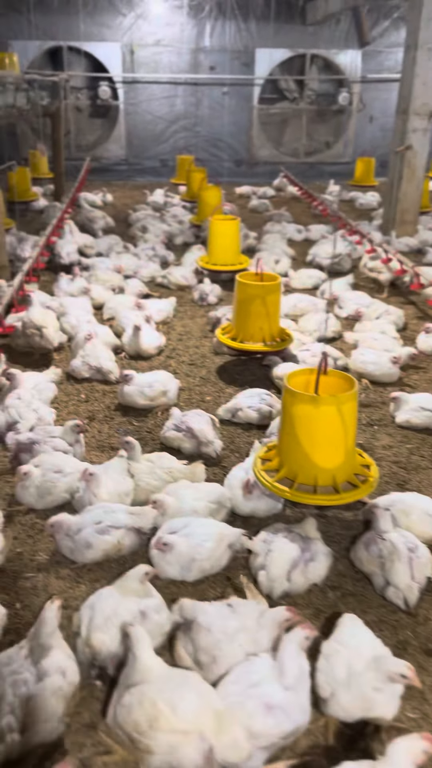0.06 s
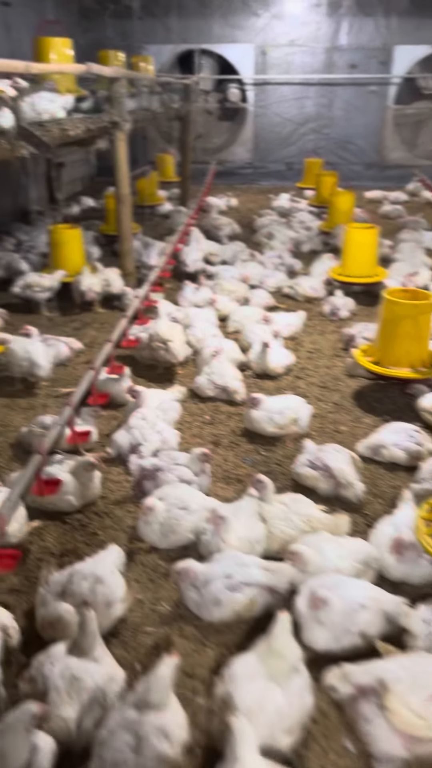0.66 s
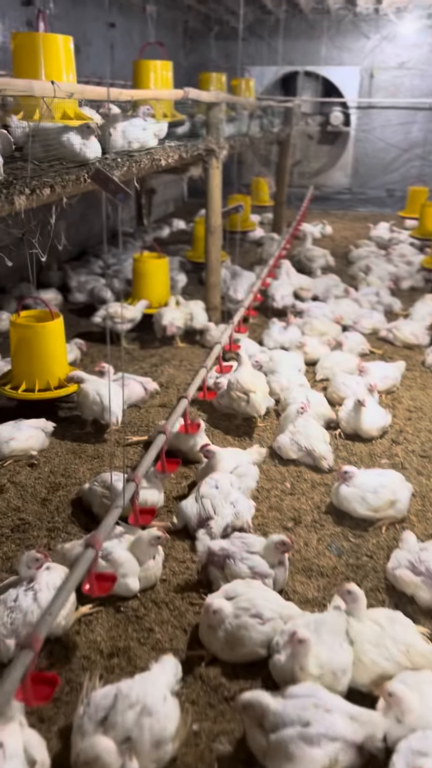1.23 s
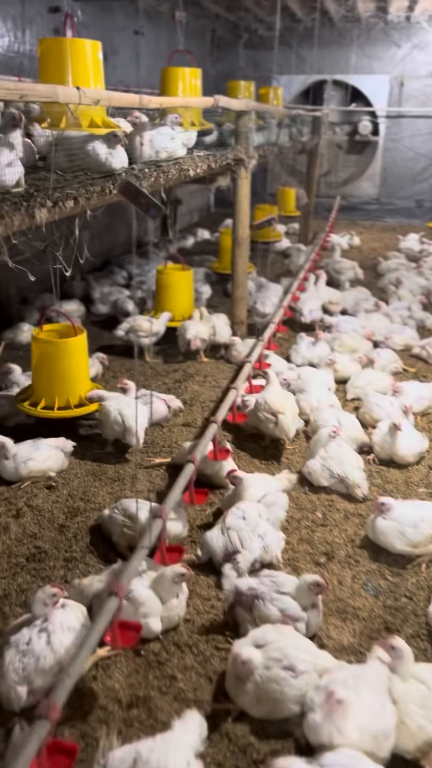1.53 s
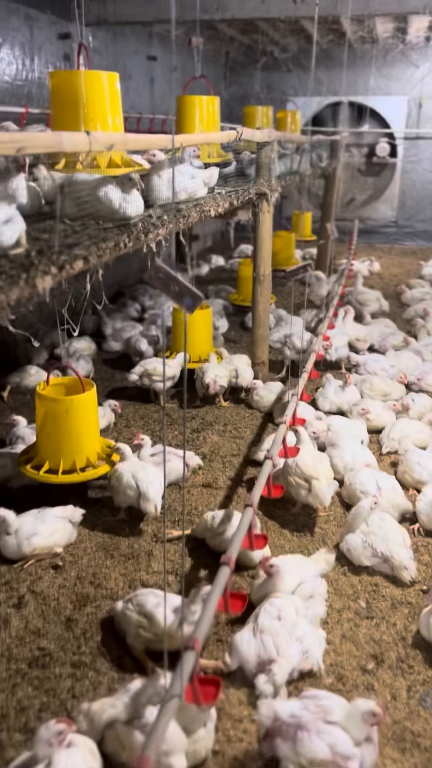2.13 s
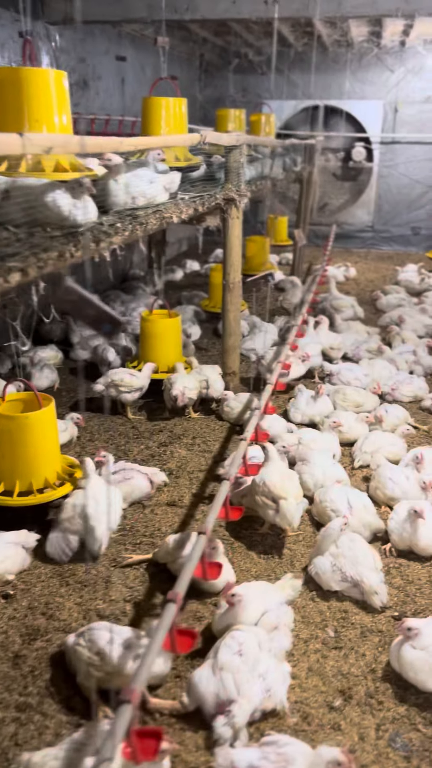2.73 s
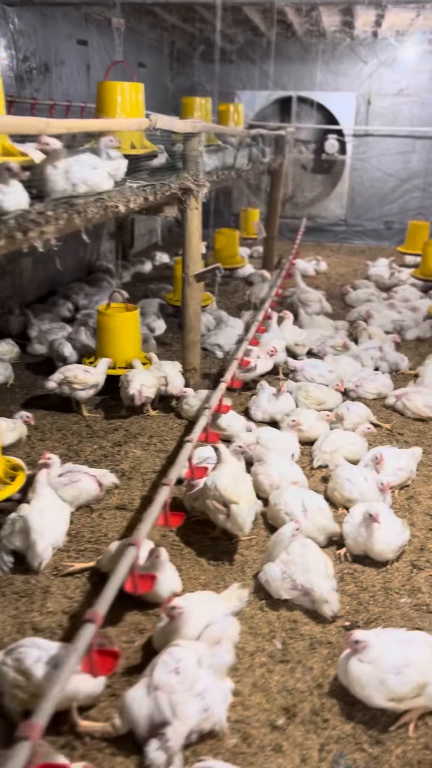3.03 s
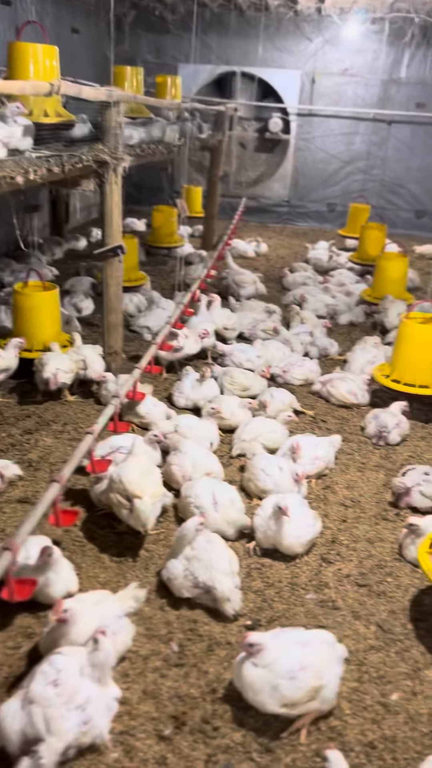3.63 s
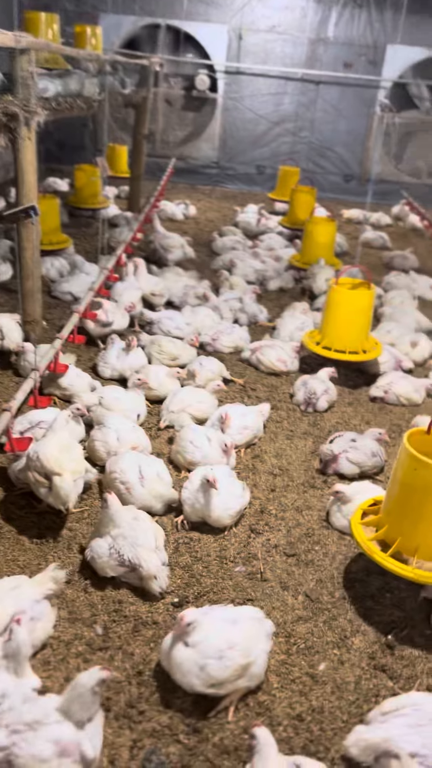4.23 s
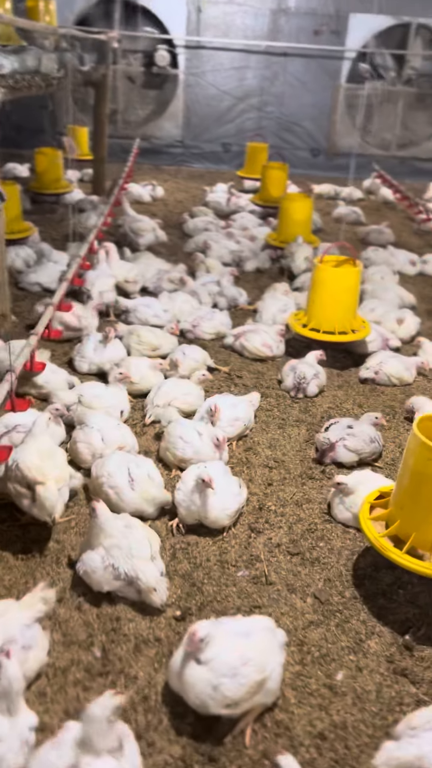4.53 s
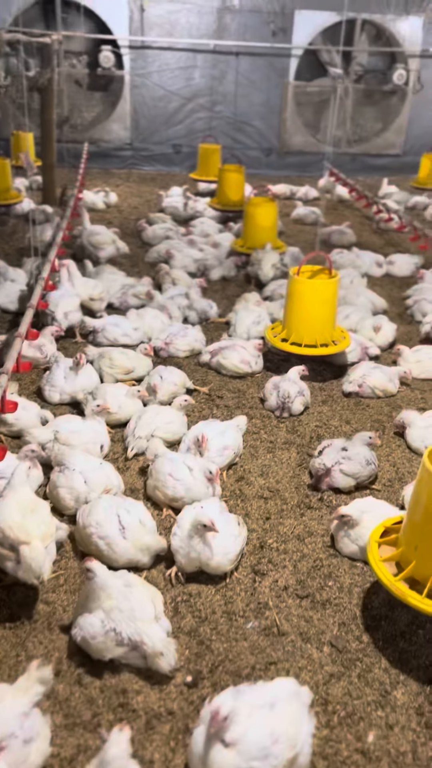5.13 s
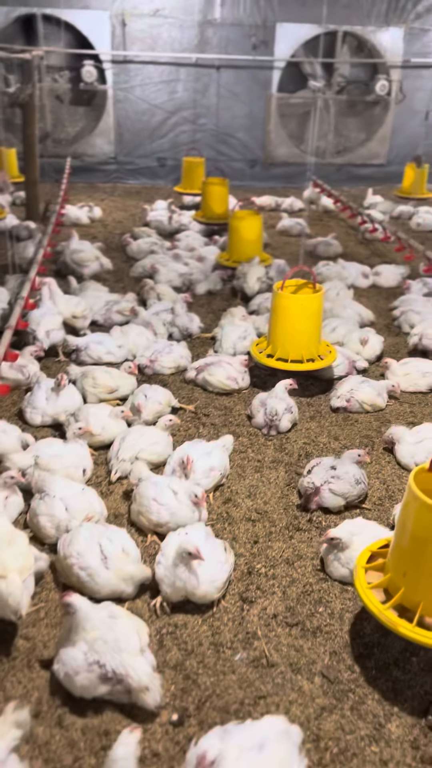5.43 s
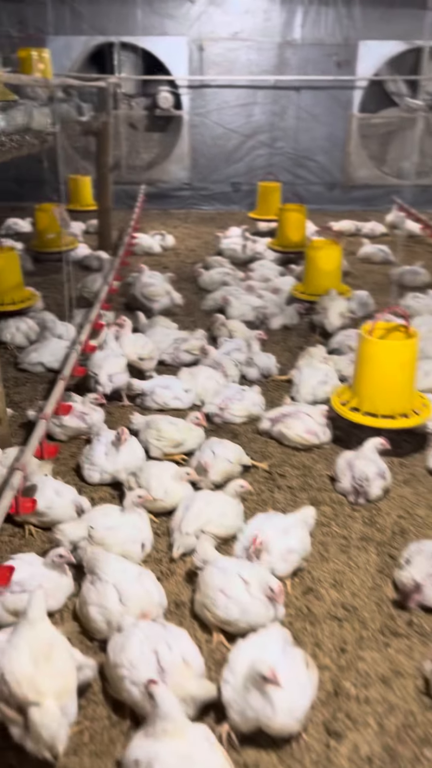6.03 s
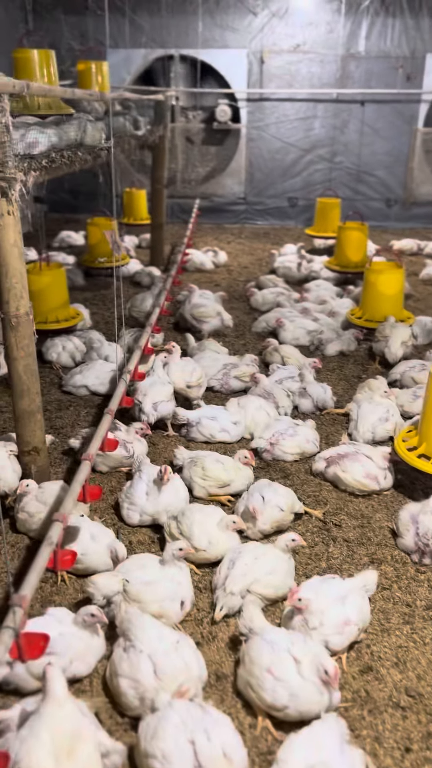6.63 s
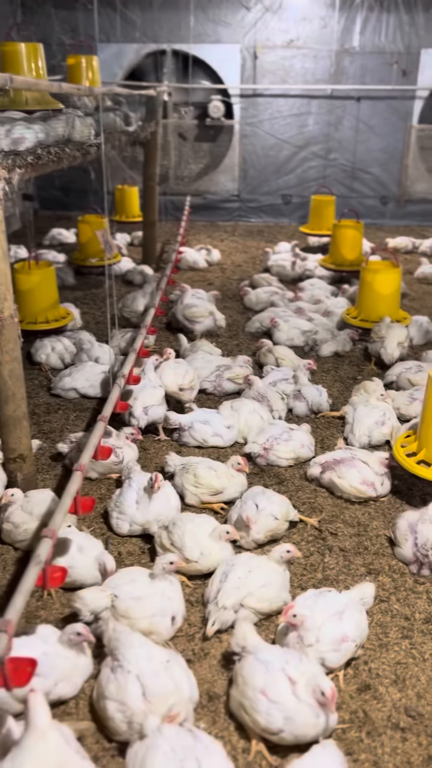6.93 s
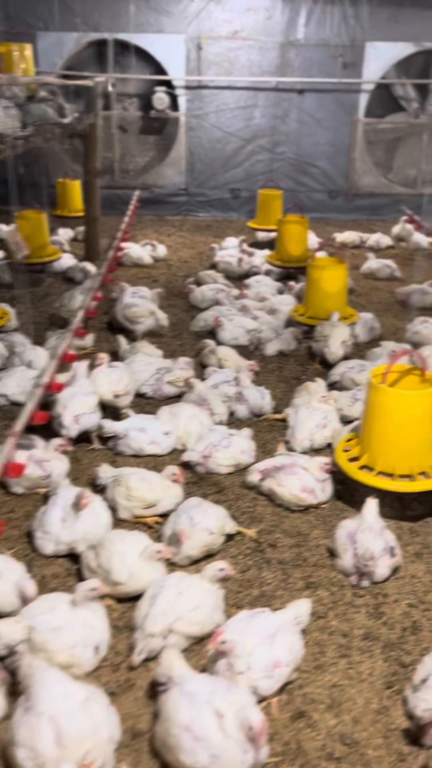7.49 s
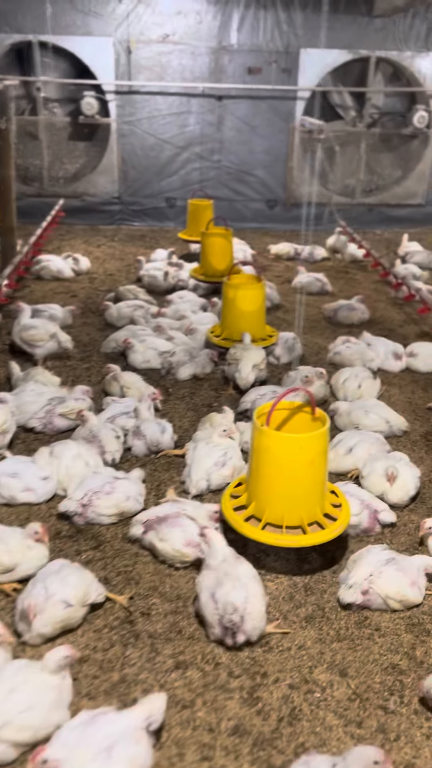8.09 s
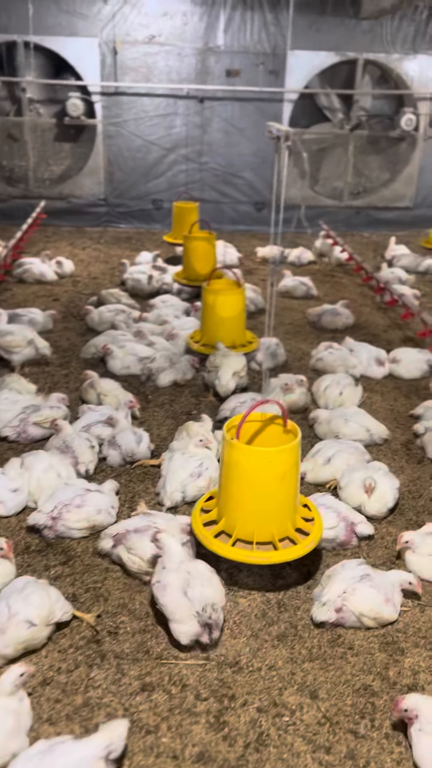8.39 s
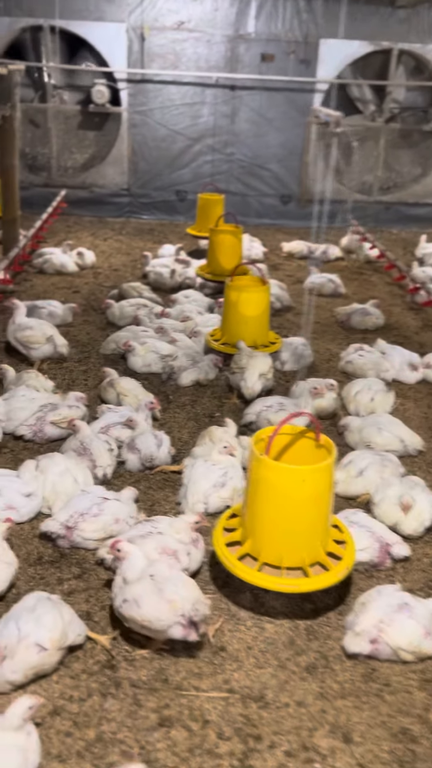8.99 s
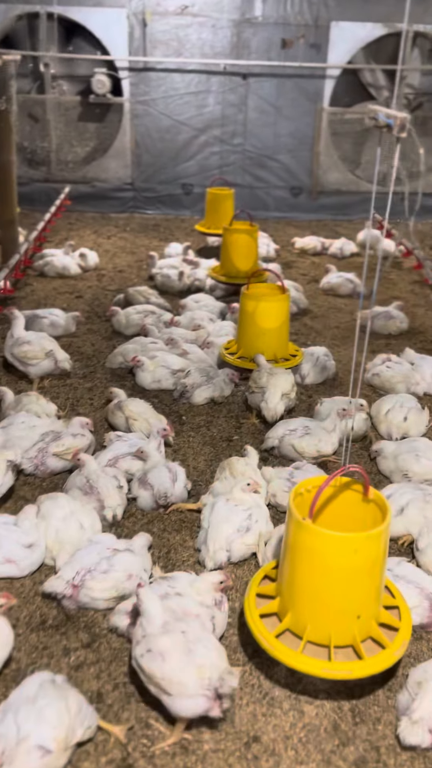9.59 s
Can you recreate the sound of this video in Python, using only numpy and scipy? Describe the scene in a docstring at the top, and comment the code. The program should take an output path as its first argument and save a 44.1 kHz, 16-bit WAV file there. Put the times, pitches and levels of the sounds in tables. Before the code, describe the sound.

A flock of young chickens chirps throughout over the constant drone and rush of exhaust fans in an enclosed shed. The closest birds begin with soft, falling peeps, then give a busy run of raspy chirps and clipped clucks before carrying on with scattered calls. Faint crunches come from the dry floor litter, and small pecking ticks appear later. The calls have a short echo, and the hum swells slightly towards the end.

```python
"""Young chickens peep and break into short clucks in a long poultry house; hundreds more chirp far off.
Each call is a gliding whistle from the bird's voice box, which flutters and rasps when it is hoarse.
Big exhaust fans in the end wall hum and push a rumble of air. Dry litter rustles and crunches
under feet and beaks, and the calls echo off the floor, feeders and walls."""
import sys
import numpy as np
from scipy import signal
from scipy.io import wavfile

SR = 44100
rng = np.random.default_rng(int(sys.argv[2]) if len(sys.argv) > 2 else 0)


def wav_out(sig):
    """Save sig, one row per channel (or a flat mono array), as 16-bit PCM at SR to the path in sys.argv[1]."""
    wavfile.write(sys.argv[1], SR, np.round(np.clip(np.atleast_2d(sig).T, -1, 1) * 32767).astype(np.int16))


N = 429975
TIME = np.arange(N) / SR
THROAT_HZ = (2130, 2850)  # the band where a bird's throat rings most

# Peeps that slide down (a positive pan is to the left): start_s, length_s, middle_hz, level_db, pan_db
FALLING_PEEPS = [(0.032, 0.043, 2500, -58, -5), (.127, 0.077, 2740, -49.5, 1), (.225, 0.055, 2650, -50, -2),
                 (0.481, 0.077, 2880, -48.5, 0), (.542, .02, 2740, -49, 0), (.645, 0.071, 2800, -49, -1),
                 (0.847, 0.041, 2280, -50, 0), (.94, 0.029, 2460, -47, 0), (1.02, 0.074, 2480, -53, 0),
                 (1.33, .06, 3500, -54, 0), (1.417, 0.02, 2850, -58, 0), (1.5, 0.05, 2350, -48, 2),
                 (2.115, .041, 3100, -49, -4), (2.161, 0.02, 2590, -39.5, -4), (2.232, 0.035, 2500, -54, 0),
                 (2.713, 0.056, 2340, -51, -2), (2.793, 0.034, 2590, -50, 2), (3.005, 0.018, 3900, -45, -2),
                 (3.1, 0.021, 1510, -36, 0), (3.198, 0.02, 1770, -38, -1), (3.603, 0.024, 3680, -41, 1),
                 (4.467, 0.065, 2720, -40, -1), (4.56, 0.038, 2440, -45.5, -2), (5.035, .05, 2400, -56, 4),
                 (5.155, 0.041, 3020, -43.5, -1), (5.503, 0.034, 3000, -43, -3),
                 (5.539, 0.04, 2850, -40.5, -3), (5.578, 0.031, 2620, -38, 0),
                 (5.792, .036, 2720, -43.5, -.5), (6.03, 0.041, 2280, -47.5, 5),
                 (6.075, 0.037, 1820, -40, 3), (6.256, 0.047, 1910, -44, 5), (6.382, .05, 2790, -51.5, 2),
                 (6.68, 0.065, 2400, -48, 0), (6.745, 0.017, 3340, -40, -1), (7.066, 0.032, 2230, -43, 5),
                 (7.313, 0.029, 2550, -38.5, 2), (7.514, .039, 2580, -47.5, 0),
                 (7.599, 0.041, 2860, -42, -2), (8.068, .029, 2340, -45, 5), (8.388, 0.032, 3180, -59, 0),
                 (8.596, 0.053, 3150, -56, 0), (8.647, 0.049, 2130, -45.5, 1), (8.721, .043, 2590, -49, 6),
                 (8.993, .035, 2850, -50, -2), (9.033, .033, 2320, -46, 10), (9.202, 0.036, 2520, -38, 4),
                 (9.259, 0.049, 2000, -48, 2), (9.335, 0.041, 2870, -44, 7),
                 (9.418, 0.025, 2270, -43.5, -1), (9.576, .016, 2200, -40, 0),
                 (9.592, 0.047, 3150, -43.5, -1), (9.617, .04, 2000, -47, 2), (9.65, .025, 2900, -47, 0)]
# Peeps that rise and then fall: start_s, length_s, top_hz, level_db, pan_db, hoarseness (0 is clear)
ARCHED_PEEPS = [(0.392, 0.027, 2330, -46, 9, 0.6), (1.197, 0.059, 2710, -47, -2, 0.66),
                (2.393, 0.083, 2650, -51, 3, 0.47), (3.017, 0.041, 2580, -41, -2, 1.05),
                (3.056, 0.071, 2600, -36.5, 0, 0.93), (3.161, 0.028, 3760, -38.5, -7, 0.37),
                (3.315, 0.04, 2770, -42, 2, .6), (3.378, .024, 2805, -40, 0, 0.64),
                (3.47, 0.098, 2580, -49, -1, .7), (3.558, 0.031, 2860, -37.5, 0, 0.37),
                (3.622, 0.019, 2920, -36, 0, 0.72), (3.653, 0.061, 2920, -45, -1, .9),
                (3.832, .039, 3070, -41, -2, 0.88), (4.024, 0.029, 2880, -41, 0, 0.63),
                (4.746, 0.097, 3246, -38, 0, 0.48), (5.192, 0.028, 2790, -40, 0, 0.3),
                (5.302, 0.056, 3330, -40, 0, 0.3), (6.275, 0.036, 2850, -44.5, 0, .5),
                (6.615, .0385, 2785, -39.5, 0, 0.74), (6.755, 0.034, 2860, -40, -2, 0.77),
                (6.942, 0.036, 2400, -48, 2, .6), (7.231, 0.091, 2680, -45, -1, .25),
                (7.912, 0.085, 2960, -46.5, 0, 0.38), (7.917, 0.036, 2030, -41, 5, 0.77),
                (8.325, .04, 2740, -45.5, 1, 0.2), (8.832, 0.14, 1840, -52, 3, 0),
                (9.069, 0.05, 2900, -44.5, 4, 1.07)]
def near_peeps():
    """Nearby birds peep in two shapes, a slide and an arch, stretched to each call's pitch and length."""
    slides = [(start, length, 1.28 * hz, hz, .85 * hz, db, pan_db, .52)  # all mildly hoarse
              for start, length, hz, db, pan_db in FALLING_PEEPS]
    arches = [(start, length, .82 * hz, hz, .76 * hz, db, pan_db, hoarse)
              for start, length, hz, db, pan_db, hoarse in ARCHED_PEEPS]
    return peeps(slides + arches, second_db=-28, third_db=-23)


def peeps(calls, second_db, third_db):
    """Each peep glides through three pitches; a hoarse one also flutters, rasps and buzzes."""
    out = np.zeros((2, N))
    rasp = .36 * noise_in(THROAT_HZ, (2, N))
    flutter = .05 * drift(55) + .018 * drift(450)
    shimmer_db = 4 * np.minimum(drift(80) + drift(400), 2)
    buzz, below, above = voice_buzz(buzz_hz=540, side_db=-5)
    # each bird calls from its own direction and reaches one ear first
    ear_lags = np.round(rng.uniform(-1, 1, len(calls)) * .00011 * SR).astype(int)
    for (start, length, first, middle, last, db, pan_db, hoarse), lag in zip(calls, ear_lags):
        at = span(start, start + length)
        progress = np.clip((TIME[at] - start) / length, 0, 1)
        glide = np.polyval(np.polyfit([0, .5, 1], [first, middle, last], 2), progress)
        pitch = glide * (1 + hoarse * flutter[at])
        phase = 2 * np.pi * np.cumsum(pitch) / SR
        side_tones = below[at] * np.sin(phase - buzz[at]) + above[at] * np.cos(phase + buzz[at])
        voice = whistle(pitch, second_db, third_db) + hoarse ** 2 * np.sqrt(2) * side_tones
        voice = rms_one(voice * from_db(hoarse * shimmer_db[at]))
        voice *= from_db(-3 * np.clip((pitch - 2850) / 400, 0, 1))  # weaker above the throat's band
        both_ears = [voice, np.roll(voice, lag)] + hoarse * rasp[:, at]
        swell = np.sqrt(2 * np.abs(np.sin(np.pi * progress ** 1.22)))
        out[:, at] += panned(both_ears * swell * from_db(db), pan_db)
    return out


def whistle(pitch, second_db, third_db):
    """The voice box makes a tone with weaker overtones at two and three times its pitch."""
    phase = 2 * np.pi * np.cumsum(pitch) / SR
    overtones = from_db(second_db) * np.sin(2 * phase) + from_db(third_db) * np.sin(3 * phase)
    return np.sqrt(2) * (np.sin(phase) + overtones)


def voice_buzz(buzz_hz, side_db):
    """A rough voice buzzes, adding a tone below and above the whistle: the buzz's phase, their gains."""
    phase = 2 * np.pi * np.cumsum(buzz_hz * np.exp(.2 * drift(15))) / SR
    below, above = (from_db(side_db + 5 * np.minimum(drift(45), 1.3)) for _ in range(2))
    return phase, below, above


# Clucks, each centred on its low note:
# time_s, half_length_s, pitch_hz, level_db, overtone_db, relative_hiss_db, beak_ring_hz
CLUCK_NOTES = [(1.548, 0.009, 1365, -41, -20, -76, 6000), (3.025, .004, 1760, -29, -26, -67, 6600),
               (3.047, .004, 1760, -31, -25, -72, 6600), (3.088, .0037, 1746, -27, -25, -69, 6500),
               (3.195, 0.0042, 1820, -21, -15, -62, 7300), (3.403, 0.0063, 1670, -29.5, -22, -55.5, 6100),
               (3.44, .0044, 1422, -34, -16, -66, 5750), (3.648, .005, 1560, -38, -8, -57, 5750),
               (3.715, 0.0068, 1344, -34.5, -19, -71, 6000), (3.851, .0065, 1705, -28.5, -17, -51, 7300),
               (4.056, 0.0065, 1590, -33.5, -20, -55.5, 5850), (4.746, .005, 1382, -31, -9, -58, 7050),
               (4.809, 0.0049, 1540, -33.5, -14, -74, 7600), (4.991, .008, 1364, -27, -34, -59, 7450),
               (5.345, 0.0077, 1995, -34, -18, -62, 6800), (5.494, 0.011, 1845, -35, -14, -69, 7000),
               (6.764, .005, 1520, -34, -8, -73, 6000), (7.142, 0.015, 1620, -30.5, -20, -55.5, 5800),
               (7.41, 0.0067, 1403, -31.5, -17, -56, 7500), (7.636, 0.0081, 1414, -35.5, -14, -63, 7600),
               (8.074, 0.017, 1015, -34.5, -12, -68, 7000), (8.329, 0.0084, 1560, -31, -24, -60, 7550)]
def clucks(lead_s, lead_db, leap, jitter, rasp):
    """A thin high note breaks down to a short, loud, rough one; the throat rasps and the beak hisses."""
    out = np.zeros((2, N))
    flutter, shake = drift(458), np.minimum(drift(500), 2)
    throat, hiss = noise_in(THROAT_HZ, (2, N)), noise_in((5950, 10800), (2, N))
    grit, crackle = rms_one(from_db(1.2 * shake)), from_db(3.5 * shake)
    for time_s, half_length, hz, db, overtone_db, hiss_db, beak_hz in CLUCK_NOTES:
        at = span(time_s - .06, time_s + .06)
        t = TIME[at] - time_s
        high = (1 - np.tanh((t + .65 * half_length + .004) / .0025)) / 2  # 1 before the break, then 0
        sag = np.exp(-rng.uniform(1, 5) * np.clip(t, -.008, .02))
        wobble = 1 + jitter * flutter[at] * (high + .61)
        pitch = hz * (1 + (leap - 1) * high) * sag * wobble
        low_note = np.exp(-(t / (.9 * half_length)) ** 2)
        lead_note = from_db(lead_db) * crackle[at] * np.exp(-((t + .2 * lead_s) / lead_s) ** 2)
        puff = np.exp(-((t + .002) / .018) ** 2)
        tone = whistle(pitch, overtone_db, third_db=-29.5) * (low_note + lead_note)
        voice = from_db(db) * (tone + rasp * puff * throat[:, at]) * grit[at]
        beak_ring = noise_in((beak_hz - 275, beak_hz + 275), (2, len(at)))
        breath = from_db(hiss_db + 7.5) * puff * (hiss[:, at] + beak_ring)
        out[:, at] += panned(voice + breath, pan_db=1.3)
    return out


def far_birds(count, pitch_hz, spread, length_s, fall, hoarse):
    """Birds all over the house call at random times, mostly falling in pitch, some hoarser than others."""
    when, long, size, bend, steep, loud, side, rough = rng.uniform(-1, 1, (count, 8)).T
    starts, lengths = (when + 1) / 2 * TIME[-1], length_s * 2 ** long
    middle_hz = pitch_hz * np.exp(spread * size)
    drop = fall * (1 + .73 * steep)
    first_hz, last_hz = middle_hz * (1 + drop * bend / 2 + drop), middle_hz * (1 - drop)
    calls = zip(starts, lengths, first_hz, middle_hz, last_hz, 5 * loud, 5 * side, hoarse * (1 + rough / 2))
    return rms_one(peeps(list(calls), second_db=-19, third_db=-41))


# The hum's three tones along the way through the house: time_s, first_db, second_db, third_db
HUM_LEVELS = [(0.0, -25, -36.5, -43.5), (0.43, -25.5, -46, -43.5), (2.15, -25.5, -28.5, -39.5),
              (7.3, -25, -27, -46.5), (7.85, -25, -35, -40), (8.6, -24.5, -27, -40.5),
              (9.38, -22.5, -33.5, -37), (9.75, -23.5, -29.5, -39)]
# How much the upper two tones waver: time_s, share_of_strength
HUM_WAVER = [(5.5, .08), (7.3, .15), (8, .3)]
def fan_hum(pitch_hz):
    """The fans hum on one low tone, with wavering overtones at two and three times its pitch."""
    phase = 2 * np.pi * pitch_hz * TIME
    waver, = in_time(HUM_WAVER)
    hum = 0
    for k, db, pan_db in zip((1, 2, 3), in_time(HUM_LEVELS), (.22, .85, .8)):
        swing = 1 + (k > 1) * waver * (drift(6.8) + 1j * drift(4.9))  # shakes strength and phase
        angle = k * phase + .34 * drift(5.4) + rng.uniform(0, 2 * np.pi)
        tone = np.sqrt(2) * np.imag(swing * np.exp(1j * angle))
        hum += panned(from_db(db + .29 * drift(1)) * tone, pan_db)
    return hum


# Thin tones of the fans: pitch_hz, level_db
WHINE_TONES = [(401, -53), (497, -54.5), (602, -52), (825, -49.5), (926, -52), (1028, -53.5)]
def fan_whine():
    """The fans also give off faint, nearly steady higher tones."""
    whine = sum(from_db(db + .56 * drift(1.8)) * np.sin(2 * np.pi * hz * TIME + drift(2.5))
                for hz, db in WHINE_TONES)
    return panned(np.sqrt(2) * whine, pan_db=2.5)


# How the air noise swells: time_s, relative_rumble_db, relative_rush_db
AIR_LEVELS = [(0.0, -33.5, -39), (4.61, -32, -36), (4.97, -34, -36.5), (5.4, -32, -35.5),
              (9.75, -34.5, -32.5)]
# Tone colour of the deep rumble: frequency_hz, relative_db
RUMBLE_COLOUR = [(16, -24), (30, -24), (42, -6.5), (62, 1.5), (85, -6), (105, -7.5), (140, -9), (220, -18)]
# Tone colour of the brighter rush: frequency_hz, relative_db
RUSH_COLOUR = [(90, 1), (135, 8), (220, 6), (330, -2), (620, -2.5), (1000, -5.5), (1450, -12), (2000, -25),
               (3000, -28), (4500, -31.5), (8000, -53)]
def fan_air():
    """Air pushed by the fans rumbles and rushes."""
    rumble_db, rush_db = in_time(AIR_LEVELS)
    deep = banded_noise(RUMBLE_COLOUR, flicker_db=1).mean(axis=0)  # long waves reach both ears alike
    rumble = from_db(rumble_db + 3.5) * rms_one(deep)
    air = banded_noise(RUSH_COLOUR, flicker_db=1.5)
    low = signal.sosfilt(signal.butter(1, 620, fs=SR, output="sos"), air)
    swell_db = rush_db - rush_db.mean()
    rush = from_db(swell_db) * low + from_db(.53 * swell_db) * (air - low)  # the treble swells less
    return rumble + from_db(rush_db.mean() + 5) * rush


# Loudness of the constant rustle: time_s, relative_db
RUSTLE_LEVELS = [(0.0, -54), (0.32, -55.5), (1.17, -55.5), (1.41, -58), (4.07, -53.5), (5.76, -54),
                 (6.3, -55.5), (6.81, -54.5), (7.39, -51.5), (8.77, -57), (9.75, -54)]
# Tone colour of the dry husks: frequency_hz, relative_db
RUSTLE_COLOUR = [(2500, -10), (5100, -8), (5900, -2), (8000, -2), (11000, -1.5), (12500, -12.5),
                 (16000, -1.5)]
# Crunches in the litter: start_s, relative_db
LITTER_CRUNCHES = [(1.115, -49), (1.24, -48), (1.772, -46.5), (1.888, -44), (2.122, -51), (2.325, -49),
                   (2.49, -46.5), (2.795, -48), (3.974, -49), (4.2, -44), (6.585, -48.5), (7.265, -50),
                   (7.48, -50), (7.572, -51), (8.442, -48.5), (9.07, -46), (9.16, -51)]
# Sharp pecks: start_s, relative_db
SHARP_PECKS = [(3.578, -43), (7.2, -38), (7.227, -48), (7.549, -38), (7.783, -45), (7.941, -41),
               (8.118, -45), (8.147, -36), (8.399, -41)]
def litter():
    """Dry husks rustle all the time and crunch where a foot or a beak comes down."""
    level_db, = in_time(RUSTLE_LEVELS)
    snaps = from_db(2.6 * np.clip(drift(350), -2, 2))  # single husks break
    crunches = bursts(LITTER_CRUNCHES, decay_s=.03) * snaps
    pecks = bursts(SHARP_PECKS + faint_pecks(per_s=2.5), decay_s=.006)
    rustle = from_db(level_db + 1) * rms_one(from_db(.74 * drift(200) + 1.28 * drift(8.1)))
    strength = np.hypot(rustle, from_db(2.5) * (crunches + pecks))
    left, right = banded_noise(RUSTLE_COLOUR, flicker_db=1.84) * strength
    return np.array([np.roll(left, 1), right])  # the left is one sample late: a slight stereo offset


def faint_pecks(per_s):
    """Birds further off peck at random times; gives rows of start_s, relative_db."""
    when, size = rng.random((int(per_s * TIME[-1]), 2)).T
    return list(zip(when * TIME[-1], -78 + 30 * size))


def bursts(hits, decay_s):
    """The strength of each hit jumps up and then dies away."""
    out = np.zeros(N)
    for start, db in hits:
        at = span(start, start + 5 * decay_s)
        t = np.maximum(TIME[at] - start, 0)
        out[at] += from_db(db) * (1 - np.exp(-t / (.12 * decay_s))) * np.exp(-t / decay_s)
    return out


def floor_bounce(sound, delay_s):
    """The floor sends back a slightly late copy of the sound."""
    return np.array([np.interp(TIME - delay_s, TIME, side) for side in sound])


def echoes(sound, count, first_s, last_s):
    """Sound bounces off the floor, feeders and posts, differently for each ear."""
    out = np.zeros((2, N))
    for k, delay_s in enumerate(rng.uniform(first_s, last_s, 2 * count)):
        ear, lag = k % 2, int(delay_s * SR)
        out[ear, lag:] += sound[ear, :N - lag] * (-1) ** (k // 2)
    return out / np.sqrt(count)


def house_reverb(sound, count=10, fade_s=.36):
    """Sound runs back and forth between the walls, losing 60 dB every fade_s, and then scatters."""
    out = np.zeros((2, N))
    for k, lag in enumerate((rng.uniform(.02, .06, 2 * count) * SR).astype(int)):
        ear, gain = k % 2, from_db(-60 * lag / SR / fade_s)
        loop = sound[ear].copy()
        for i in range(lag, N, lag):
            loop[i:i + lag] += gain * loop[i - lag:i][:N - i]
        out[ear] += loop - sound[ear]
    return echoes(out / np.sqrt(count), count=6, first_s=.00055, last_s=.012)


# How alike the noise is at the two ears: frequency_hz, likeness (1 is the same)
EAR_LIKENESS = [(60, .999), (130, .993), (300, .98), (700, .85), (1400, .76), (2800, .35), (6000, .62),
                (14000, .5)]
# How far the noise leans to the left: frequency_hz, pan_db
NOISE_PAN = [(80, 0), (300, .8), (700, 2.8), (1400, 3), (2800, .3), (12000, 0)]
TOP_HZ = 15850  # upper edge of the treble
def banded_noise(colour, flicker_db):
    """Stereo noise for air and litter, built from bands that each flicker on their own."""
    edges = np.geomspace(colour[0][0], min(colour[-1][0], TOP_HZ), 2 * len(colour))
    out, white = 0, rng.standard_normal((2, 2, N))
    for k, band in enumerate(zip(edges, edges[1:])):
        shared, side = signal.sosfilt(signal.butter(2, band, "band", fs=SR, output="sos"), white[k % 2])
        hz = np.sqrt(band[0] * band[1])
        alike = at_hz(EAR_LIKENESS, hz)
        pair = np.sqrt(1 + alike) * shared + np.sqrt(1 - alike) * side * [[1], [-1]]
        gain = from_db(at_hz(colour, hz) + flicker_db * drift(12.6))
        out += gain * panned(pair, at_hz(NOISE_PAN, hz))
    return rms_one(out)


def noise_in(band_hz, shape):
    """Noise between two frequencies, with an average strength of 1."""
    band = signal.butter(2, band_hz, "band", fs=SR, output="sos")
    return rms_one(signal.sosfilt(band, rng.standard_normal(shape)))


def drift(rate_hz):
    """A smooth random wobble of about 1 either way; a higher rate wobbles faster."""
    pole = np.exp(-40 * np.pi * rate_hz / SR)
    slow = signal.lfilter([1], [1, -2 * pole, pole * pole], rng.standard_normal(N // 20 + 4002))[4000:]
    return np.interp(np.arange(N) / 20, np.arange(len(slow)), rms_one(slow))


def from_db(db):
    """Turn decibels into a number to multiply by."""
    return 10 ** (np.asarray(db) / 20)


def rms_one(sound):
    """Scale to an average strength (rms) of 1."""
    return sound / np.sqrt(np.mean(sound ** 2) + 1e-20)


def in_time(rows):
    """Join a table's points into one curve over time for each column."""
    times, *columns = np.transpose(rows)
    return [np.interp(TIME, times, column) for column in columns]


def at_hz(rows, hz):
    """Read a table at any frequency, with octaves evenly spaced."""
    frequencies, values = np.transpose(rows)
    return np.interp(np.log(hz), np.log(frequencies), values)


def span(start_s, end_s):
    """Sample numbers between two times."""
    return np.arange(max(int(start_s * SR), 0), min(int(end_s * SR), N))


def panned(sound, pan_db):
    """Make the left side pan_db louder than the right."""
    return sound * from_db(np.array([[pan_db], [-pan_db]]) / 2)


def scene():
    """Near birds with their echoes, the far flock heard through the house, fans and litter."""
    near = near_peeps() + clucks(lead_s=.013, lead_db=-18, leap=1.9, jitter=.042, rasp=.26)
    near += from_db(-18) * floor_bounce(near, delay_s=.00266)
    early = from_db(-7) * echoes(near, count=12, first_s=.00194, last_s=.018)
    chirps = far_birds(count=380, pitch_hz=2468, spread=.3, length_s=.036, fall=.1398, hoarse=.62)
    murmur = far_birds(count=140, pitch_hz=908, spread=.55, length_s=.0234, fall=.169, hoarse=.7)
    far = from_db(-48) * (chirps + murmur)
    reverb = house_reverb(from_db(-13.5) * near + .84 * far)
    birds = near + early + .5 * far + reverb
    return birds + litter() + fan_hum(pitch_hz=100.1) + fan_whine() + fan_air()


def record(dry):
    """The very highest treble is cut off steeply."""
    return signal.sosfilt(signal.ellip(10, .1, 80, TOP_HZ, fs=SR, output="sos"), dry)


dry = scene()
out = record(dry)
wav_out(out)
```